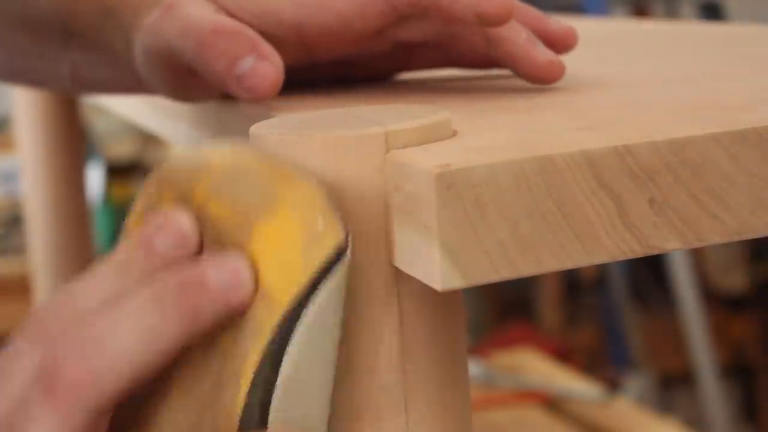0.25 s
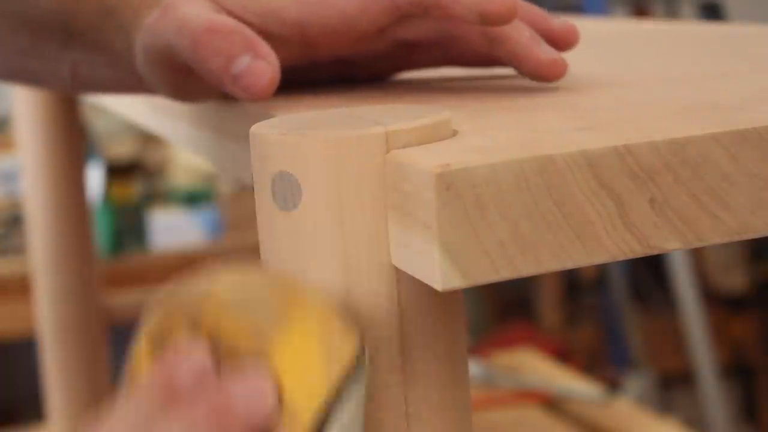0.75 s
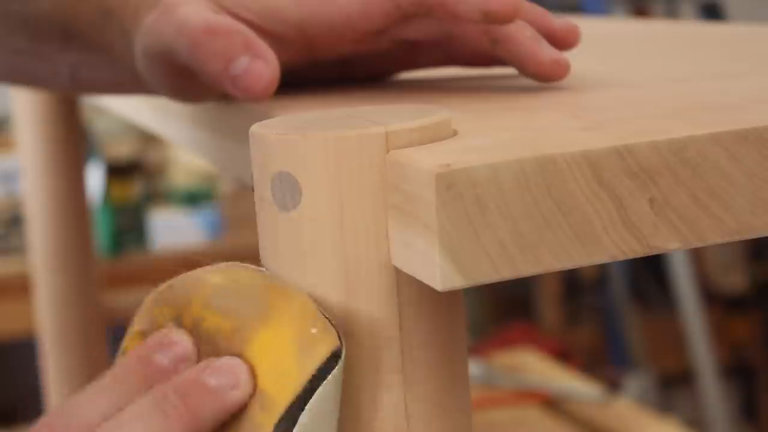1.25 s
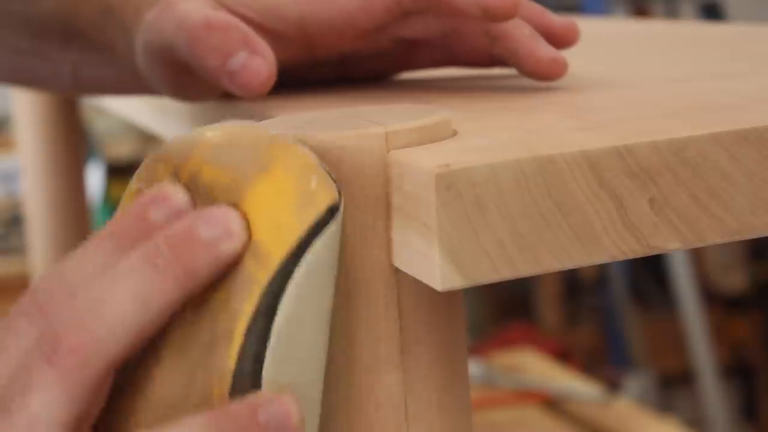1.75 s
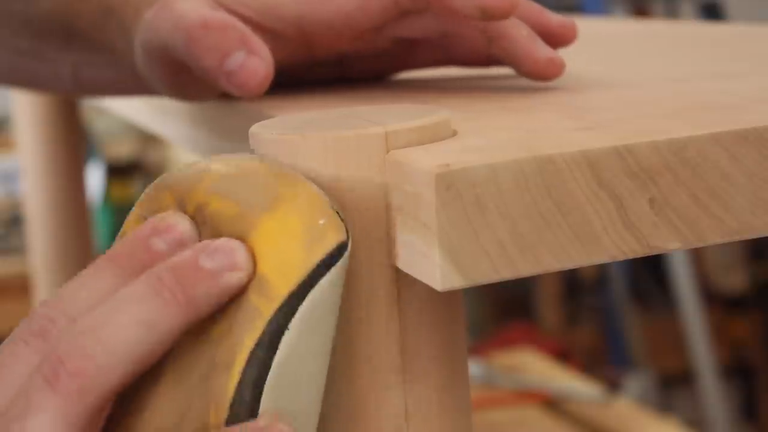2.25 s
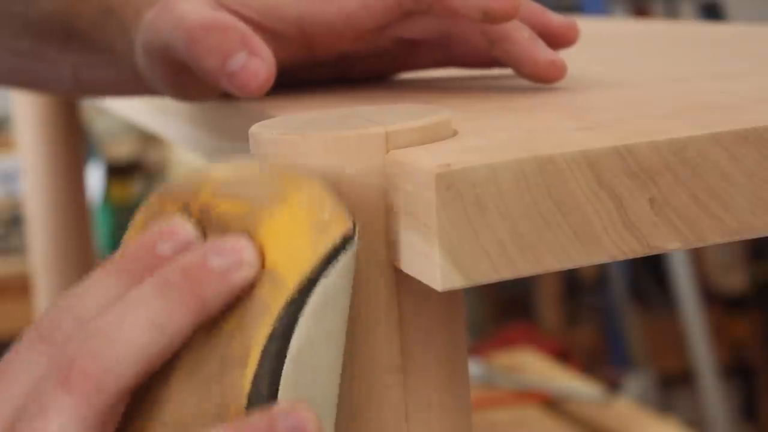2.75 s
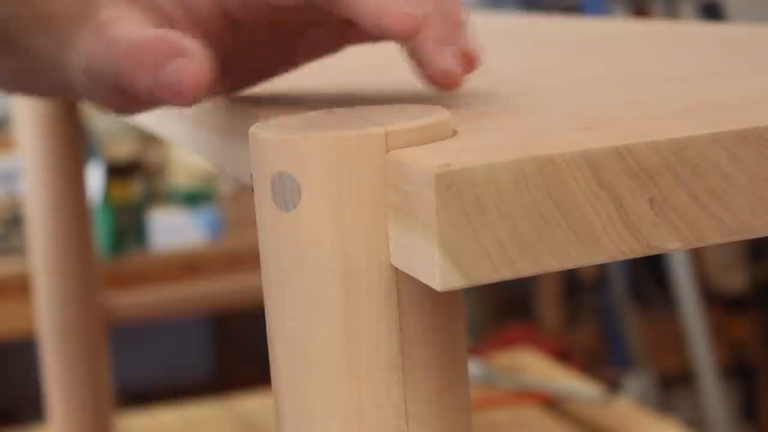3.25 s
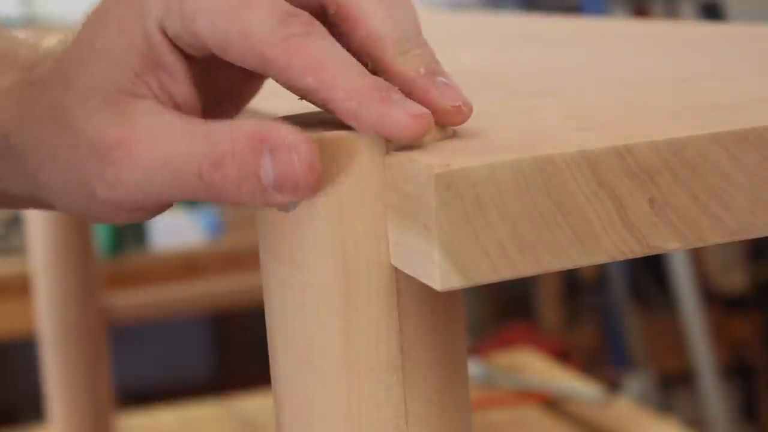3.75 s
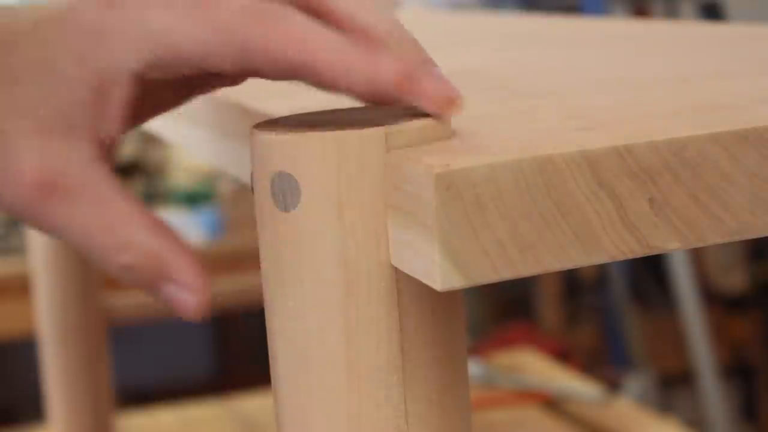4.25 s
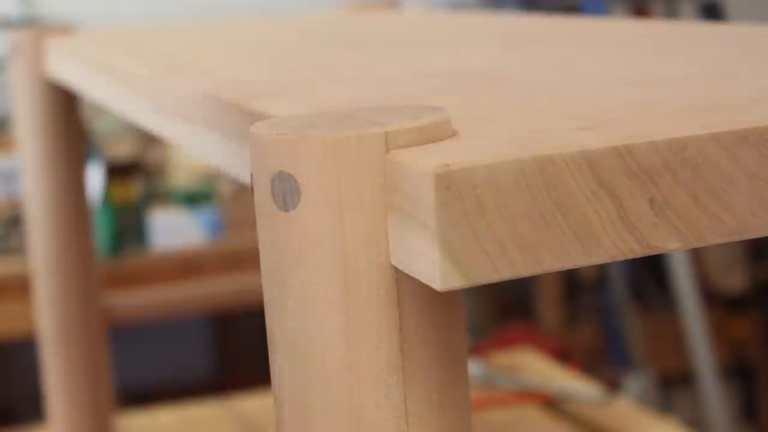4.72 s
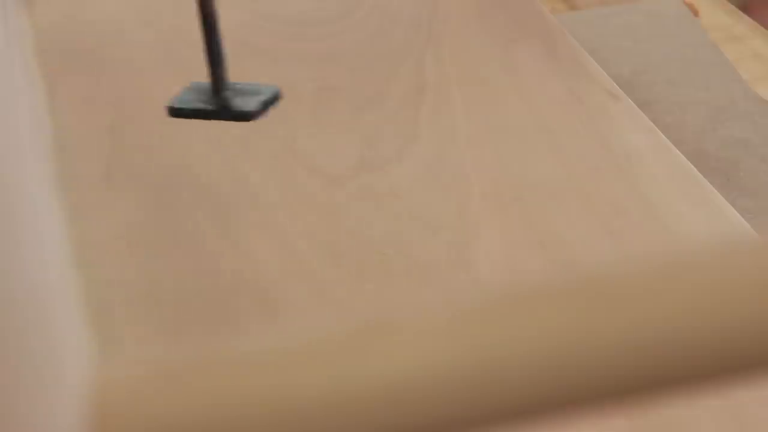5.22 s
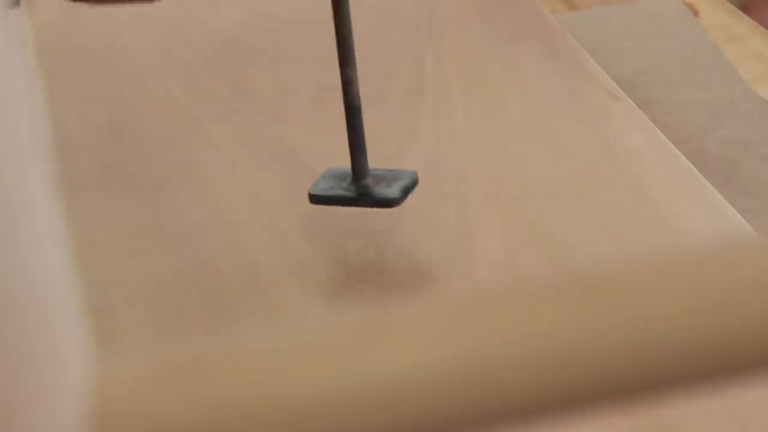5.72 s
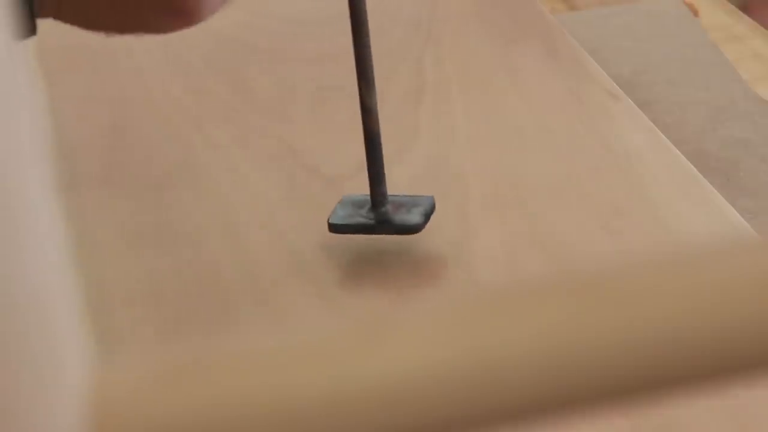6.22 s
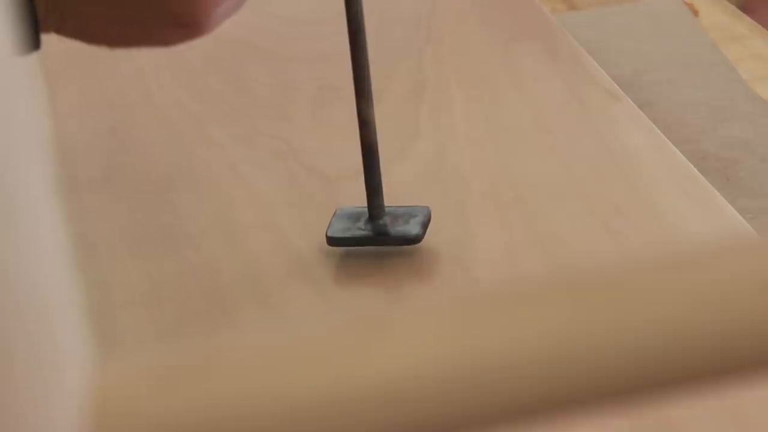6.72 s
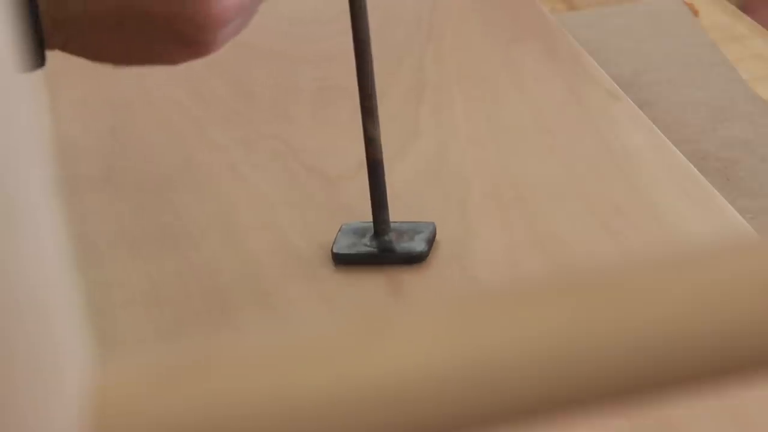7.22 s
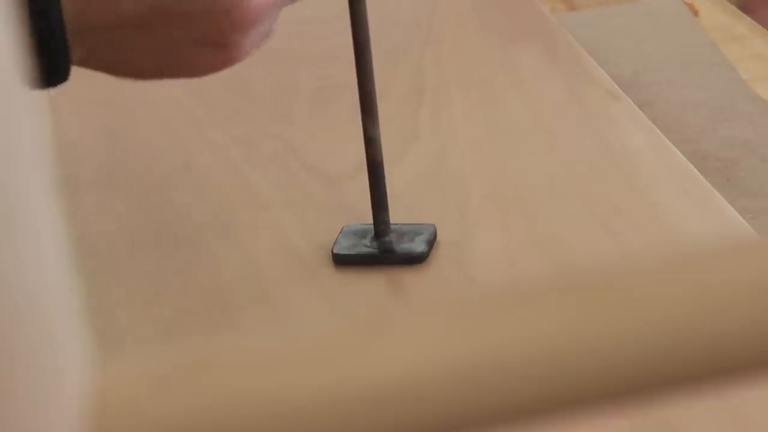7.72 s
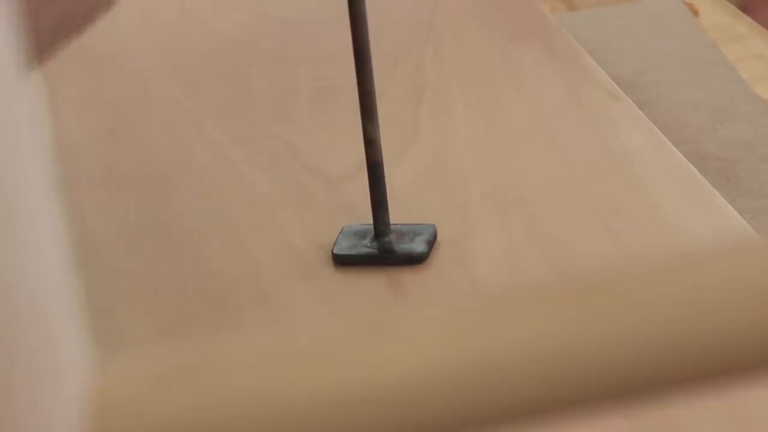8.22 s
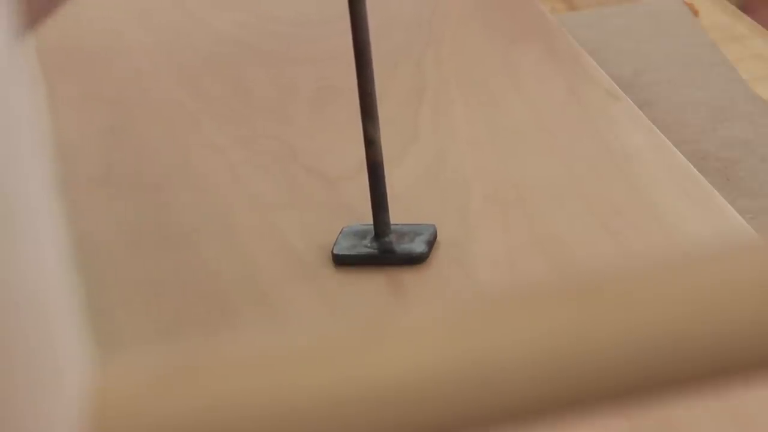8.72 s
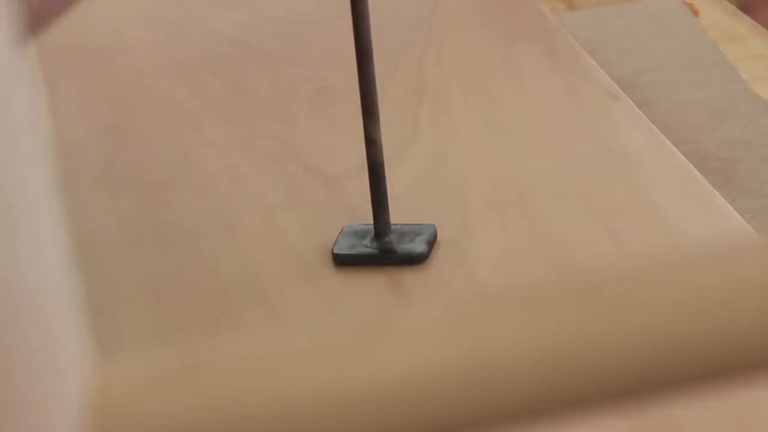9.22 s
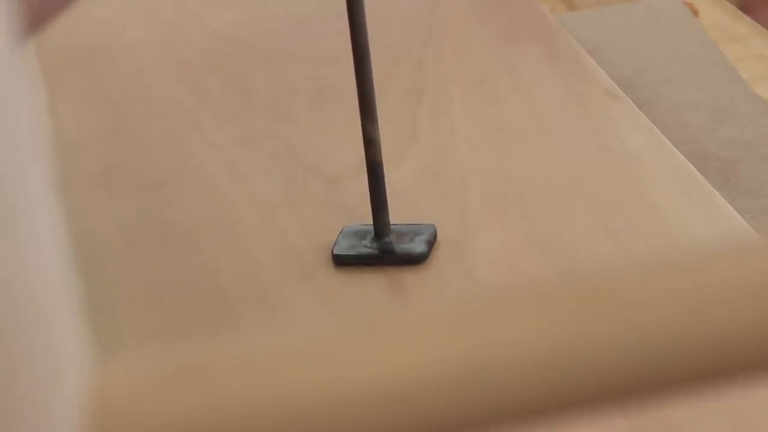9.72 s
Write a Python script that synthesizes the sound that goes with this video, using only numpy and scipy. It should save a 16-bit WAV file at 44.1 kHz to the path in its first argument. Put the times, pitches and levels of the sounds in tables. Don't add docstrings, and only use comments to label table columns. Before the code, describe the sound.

An electric sander whines and hisses steadily against a wooden leg, then abruptly a quiet workshop where an iron tool knocks onto wood and creaks.

```python
import sys
import numpy as np
from scipy import signal
from scipy.fft import rfft, irfft, next_fast_len
from scipy.io import wavfile

SR = 44100
rng = np.random.default_rng(int(sys.argv[2]) if len(sys.argv) > 2 else 0)


def level_to_linear(level):
    exponent = np.asarray(level, float) / 20
    return 10 ** exponent


def transcribe(u):
    v = np.clip(np.atleast_2d(u).T, -1, 1)
    q = np.round(v * 32767).astype(np.int16)
    wavfile.write(sys.argv[1], SR, q)


N = 439677
TIME = np.arange(N) / SR
CUT_S = 4.9345

# pitch in Hz, level in dB, time to fade by 60 dB in seconds,
# direction of motion under the iron (1 or -1).
BOARD_MODES = [(113, -36.8, 0.3, 1), (181, -44.5, 0.2, 1), (327, -20.5, 0.19, -1), (404, -17.2, 0.247, -1),
               (475, -14.7, 0.223, 1), (515, -10.8, 0.193, 1), (547, -3.5, 0.104, 1), (578, 0.0, 0.055, -1),
               (635, -6.9, 0.14, -1), (664, -7.2, 0.1, 1), (949, -4.3, 0.057, 1), (1029, -3.1, 0.128, -1),
               (1227, -13.5, 0.035, 1)]


def rms_one(x):
    return x / np.sqrt(np.mean(x ** 2) + 1e-20)


def in_time(rows):
    s, *columns = np.transpose(rows)
    return [np.interp(TIME, s, column) for column in columns]


def drift(rate):
    step = 40
    r = np.exp(-2 * step * np.pi * rate / SR)
    noise = rng.standard_normal(N // step + 2002)
    slow = signal.lfilter([1], [1, -2 * r, r * r], noise)[2000:]
    return np.interp(np.arange(N) / step, np.arange(len(slow)), rms_one(slow))


def coloured(x, spectrum, resonances):
    size = next_fast_len(N)
    hz = np.arange(size // 2 + 1) * SR / size + 1
    curve_hz, curve_db = np.transpose(spectrum)
    level_db = np.interp(np.log(hz), np.log(curve_hz), curve_db)
    for centre_hz, width_hz, bump_db in resonances:
        level_db += bump_db / (1 + (2 * (hz - centre_hz) / width_hz) ** 2)
    return rms_one(irfft(rfft(x, size) * level_to_linear(level_db), size)[:N])


def patchy(x, band_db, count=20):
    size = next_fast_len(len(x))
    spectrum = rfft(x, size)
    pitch = np.log2(np.arange(size // 2 + 1) * SR / size + 1)
    centres = np.linspace(np.log2(60), np.log2(18000), count)
    out = 0
    for centre, row in zip(centres, np.eye(count)):
        share = np.interp(pitch, centres, row)
        band = irfft(spectrum * share, size)[:len(x)]
        out = out + band * level_to_linear(band_db(2 ** centre)[:len(x)])
    return out


def ring(clicks, hz, t60):
    r, w = level_to_linear(-60 / (t60 * SR)), 2 * np.pi * hz / SR
    return signal.lfilter([0, np.sin(w)], [1, -2 * r * np.cos(w), r * r], clicks + 1e-18)


def soften(x, hz):
    return signal.sosfilt(signal.butter(2, hz, fs=SR, output="sos"), x)


def motor():
    # time in seconds, shaft turns per second, armature slot whine in dB.
    shaft = [(0.0, 177.17, -59), (0.4, 177.18, -60), (0.7, 177.13, -59), (1.0, 177.27, -64),
             (1.4, 177.16, -60), (1.7, 177.16, -58.5), (2.2, 177.26, -62.5), (2.4, 177.26, -59),
             (2.7, 177.26, -59.5), (3.1, 177.15, -58), (3.6, 177.01, -62), (3.8, 177.04, -60),
             (4.05, 176.97, -56), (4.4, 176.91, -62), (4.8, 176.87, -62)]
    fan_orders = (4, 5, 10, 14, 28, 42, 56, 70, 84)
    fan_levels = (-7.5, -17., -14., -.5, -13., -20., -30., -19.5, -30.)
    # time in seconds, level in dB.
    unbalance = [(0, 1), (.15, 3), (1.9, 4), (2.2, 2.5), (2.85, 2.5), (3.0, 0), (4.5, -1), (4.9, -3)]
    # time in seconds, level of the lower, middle and upper line in dB.
    brushes = [(0, -3, -4, -1), (.5, 0, -2, 1), (1.0, 1, 2, 2), (1.5, 0, -4, 2), (2.2, 1, 2, 0),
               (2.7, 1, -4, -5), (3.1, -5, -5, -1), (3.5, -5, 0, -4), (3.9, 1, 3, -2), (4.3, -1, 0, -2),
               (4.5, -2, 0, 1), (4.9, 0, 2, 1)]
    slot_order, commutator_order, fan_blades = 22, 44, 14
    field_hz, usual_turns_per_s = 120, 177.16
    fan_whine_db, commutator_whine_db = -56.5, -71
    speed, slot_db = in_time(shaft)
    load_db = 9 * (usual_turns_per_s - speed)
    unbalance_db, = in_time(unbalance)
    turn = 2 * np.pi * np.cumsum(speed) / SR
    out = level_to_linear(slot_db + .8 + .6 * drift(5)) * np.sin(slot_order * turn)

    for k, own_db in zip(fan_orders, fan_levels):
        level_db = fan_whine_db + own_db + 1 + 1.5 * drift(6)
        if k % fan_blades == 0:
            level_db = level_db + load_db
        if k == fan_orders[0]:
            level_db = level_db + unbalance_db
        out = out + level_to_linear(level_db) * np.sin(k * turn + k + .35 * drift(8))

    commutator_db = commutator_whine_db + .5 * drift(.5)
    for side, brush_db in zip((-1, 0, 1), in_time(brushes)):
        beat = 2 * np.pi * side * field_hz * TIME
        level_db = commutator_db + brush_db + 1 + drift(1.5)
        out = out + level_to_linear(level_db) * np.sin(commutator_order * turn + beat)
    return np.sqrt(2) * out, turn


def echoed(x):
    t60, share = .35, .17
    t = np.arange(round(t60 * SR)) / SR
    echoes = rng.standard_normal(len(t)) * level_to_linear(-60 * t / t60) * (t > .004)
    echoes = echoes / np.linalg.norm(echoes)
    echoes = signal.sosfilt(signal.butter(2, 1000, "high", fs=SR, output="sos"), echoes)
    return x + share * signal.fftconvolve(x, echoes)[:N]


def pad(turn):
    # time in seconds, grit level in dB.
    pressure = [(0.0, -46), (0.1, -46), (0.3, -46.5), (1.6, -46), (2.0, -46.5), (2.35, -46.5), (3.1, -46),
                (3.5, -46.5), (4.0, -46), (4.4, -46.5), (4.75, -44.5), (4.9, -46.5)]
    # time in seconds, loss in dB.
    grip_losses = [(.23, 2.5), (.42, 1), (.59, 1), (.83, 1), (1.04, 1.5), (1.24, 0.5), (1.41, 0.4),
                   (1.71, 2.5), (1.86, 2.2), (2.08, 0.5), (2.26, -1), (2.44, 2.5), (2.61, 3), (2.78, 2),
                   (2.94, 3), (3.14, 1), (3.30, 1.7), (3.50, 2), (3.73, 1), (3.9, 0.2), (4.24, 1.4),
                   (4.44, 1), (4.67, 1)]
    # time in seconds, half width in seconds, change in dB.
    strokes = [(.1, .12, 2), (2.95, .04, -1), (.7, .05, 1.5), (1.1, .05, -1), (1.46, 0.035, 1.5),
               (2.0, 0.059, 2), (2.16, 0.03, 4), (2.33, 0.034, 3), (3.06, .04, 2), (3.18, .05, 3.5),
               (3.65, .06, -2), (4.12, 0.15, -3), (4.42, .06, 0), (4.78, 0.076, -2)]
    # frequency in Hz, level in dB per Hz.
    sanding_colour = [(45, -33.5), (91, -23), (163, -11.5), (300, -3.5), (770, -3.5), (1200, -2),
                      (1900, 0.5), (2800, -5.5), (4000, -5.5), (5300, -10.5), (7700, -11.5), (10600, -20.5),
                      (13500, -22.5), (16000, -25)]
    # frequency in Hz, width in Hz, height in dB.
    table_bumps = [(63, 6, 3.6), (76, 6, -2.8), (76, 6, -1.0), (95, 9, 5.2), (119, 8, 6.8), (142, 9, -7.5),
                   (149, 6, -5.9), (160, 23, 4.8), (169, 19, 3.2), (252, 15, 3.8), (289, 13, 4.3),
                   (315, 10, 4.1), (338, 13, -5.6), (376, 11, -5.7), (445, 16, -4.2), (561, 19, 5.7),
                   (580, 23, -3.5), (679, 38, 4.6), (739, 12, 6.0), (765, 30, -4.8), (834, 17, 4.7),
                   (889, 16, 7.8), (902, 36, -5.1), (953, 23, 6.6), (976, 20, -5.1), (2933, 140, 3.2),
                   (3084, 30, 6.1), (4867, 80, 4.3), (6476, 260, 3.3), (12609, 506, 3.4)]
    # frequency in Hz, width in Hz, height in dB.
    housing_bumps = [(1065, 50, 3), (1460, 50, 2.5), (1785, 110, 1.5), (1175, 25, -3), (1290, 120, 1.2),
                     (2345, 30, 3), (2560, 60, 1.5), (2680, 50, -2.5), (2984, 22, 4), (3155, 20, 4),
                     (3200, 50, -3), (3596, 25, 2), (6310, 90, 2.5), (7700, 400, 1.5), (8010, 150, -3),
                     (9100, 500, 2), (14500, 1000, 2)]
    easing_s = (3.1, 3.5)
    # frequency in Hz, change in dB.
    eased_colour = [(700, 0), (1150, 2), (1650, -2.5), (2200, 0), (3100, -0.6), (4200, -0.56)]
    # share of the pressure swing, own wander in dB
    follows, wander_db = (0.95, 0.5, 0.89), (0.34, .5, 0.5)
    buzz_hz, buzz_octaves, grip_loss_s = 1710, 0.3, 0.029
    coarse = TIME[::40]
    lost_db = sum(db * np.exp(-((coarse - s) / grip_loss_s) ** 2) for s, db in grip_losses)
    grit_db = in_time(pressure)[0] - np.interp(TIME, coarse, lost_db)
    swing = grit_db - grit_db[TIME < CUT_S].mean()
    part_changes = [(share - 1) * swing + own_db * drift(5.8) for share, own_db in zip(follows, wander_db)]
    stroke_db = sum(db * np.exp(-((coarse - s) / width) ** 2) for s, width, db in strokes)
    stroke_db = np.interp(TIME, coarse, stroke_db)
    eased = np.interp(TIME, easing_s, [0, 1])
    eased_hz, eased_db = np.transpose(eased_colour)

    uneven_db = 1.3 * np.minimum(rng.exponential(1, N), 4)
    grains = rng.standard_normal(N) * level_to_linear(uneven_db)
    grains = grains * (1 + .03 * np.sin(turn)) * level_to_linear(0.24 * drift(31.0))

    def band_db(hz):
        place = np.log([450, 800, 1100, 1600, 3000, 4200])
        part_shares = ([1, 0, 0, 0, 0, 0], [0, 1, 1, 0, 0, 0], [0, 0, 0, 0, 0, 1])
        change = eased * np.interp(np.log(hz), np.log(eased_hz), eased_db)
        change = change + stroke_db * np.exp(-(np.log2(hz / buzz_hz) / buzz_octaves) ** 2)
        for shares, part_db in zip(part_shares, part_changes):
            change = change + np.interp(np.log(hz), place, shares) * part_db
        return change + 0.6 * drift(26.0)

    heard = round((CUT_S + .1) * SR)
    sanding = coloured(echoed(grains), sanding_colour, table_bumps + housing_bumps)
    sanding = patchy(sanding[:heard], band_db)
    return level_to_linear(grit_db + 4.0) * np.pad(sanding, (0, N - heard))


def knock():
    # time in seconds, ringing level in dB.
    settling = [
        (7.409, 0),
        (7.414, -9),
    ]
    stilled_first_hz, sooner_s = (404, 635, 664), .017
    blow = level_to_linear(-26.4) * (np.arange(N) == round(7.3483 * SR))
    out = -level_to_linear(-36) * ring(blow, 404, .5)
    out = out + level_to_linear(-43.0) * ring(blow, 170, .2)
    for hz, level_db, t60, sign in BOARD_MODES:
        early_s = sooner_s * (hz in stilled_first_hz)
        stilled_db = np.interp(TIME + early_s, *np.transpose(settling))
        out = out + sign * level_to_linear(level_db + stilled_db) * ring(blow, hz, t60)
    return soften(out, 400)


def creak():
    # start in seconds, hold in seconds, level in dB, fading in dB per second while held.
    presses = [
        (7.56, .04, -65, 120),
        (7.622, 0.24, -57, -1),
        (7.927, 0.033, -58, 60),
        (7.97, .04, -58, 90),
        (8.127, 0.094, -64, -30),
        (8.293, .22, -67, 60),
    ]
    attack_s, release_s = .008, .03
    out = np.zeros(N)
    for s, hold, level_db, fading_db in presses:
        shape = np.interp(TIME, [s - attack_s, s, s + hold, s + hold + release_s], [0, 1, 1, 0])
        faded_db = level_db - fading_db * np.clip(TIME - s, 0, hold)
        out = np.maximum(out, shape ** 2 * level_to_linear(faded_db))
    return out


def rocking():
    # time in seconds, level of low modes in dB, level of high modes in dB.
    touches = [(7.403, -59, -66), (7.445, -58, -72), (7.466, -53, -68), (7.564, -56, -70),
               (7.622, -50, -64), (7.65, -55, -68), (7.666, -60, -72), (7.684, -55, -59), (7.696, -65, -65),
               (7.706, -63, -63), (7.719, -63, -61), (7.735, -63, -59), (7.754, -54, -57),
               (7.766, -61, -64), (7.774, -64, -54), (7.791, -52, -70), (7.8, -60, -70), (7.814, -67, -57),
               (7.822, -57, -68), (7.835, -54, -66), (7.852, -52, -59), (7.862, -62, -65),
               (7.917, -57, -70), (7.925, -55, -53), (7.948, -60, -70), (7.963, -68, -67),
               (7.975, -47.5, -52), (7.985, -60, -63), (7.998, -62, -64), (8.012, -65, -60),
               (8.131, -47.5, -55), (8.143, -65, -62), (8.15, -58, -68), (8.171, -49, -55),
               (8.188, -60, -68), (8.2023, -54, -52.5), (8.212, -56, -65), (8.222, -59, -70),
               (8.233, -64, -64), (8.315, -61, -57), (8.326, -55, -65), (8.402, -68, -68)]
    # time in seconds, pitch in Hz, level in dB, time to fade by 60 dB in seconds.
    rebounds = [
        (7.395, 500, -53, .1),
        (7.397, 1030, -57, .13),
        (7.446, 415, -63.5, .45),
        (7.39, 185, -65, .4),
        (7.368, 690, -53, .09),
    ]
    s, low_db, high_db = np.transpose(touches)
    at = np.round(s * SR).astype(int)
    slips = (rng.random(N) < 1500.0 / SR) * rng.standard_normal(N)
    slips = slips * creak() * level_to_linear(-17.0)
    out = 0
    for hz, level_db, t60, sign in BOARD_MODES:
        touch_db = high_db - 0.5 if hz > 800 else low_db - 3.0
        clicks = slips.copy()
        clicks[at] += level_to_linear(touch_db + 1.9 * rng.normal(0, 1, len(at)))
        if hz == 404:
            out = out + sign * level_to_linear(-17) * ring(clicks, hz, .25)
        out = out + sign * level_to_linear(1.28 * level_db) * ring(clicks, hz, 0.66 * t60)
    # Hz, fading time in seconds, dB
    for hz, t60, level_db in [(1490, .021, 0), (1250, .05, -7), (2100, .008, -2), (724, .034, -3.5),
                              (180, .1, -12.5)]:
        if hz == 1490:
            level_db = -2.5
        out = out + level_to_linear(level_db) * ring(clicks, hz, t60)
    for s, hz, level_db, t60 in rebounds:
        bounce = 1. * (np.arange(N) == round(s * SR))
        out = out + level_to_linear(level_db) * ring(bounce, hz, t60)
    return soften(out, 1350.0)


def ticks():
    # time in seconds, peak in dB, centre in Hz, width in Hz.
    tick_rows = [(5.266, -59.5, 5800, 3000), (5.716, -58.5, 5800, 2400), (5.777, -53.5, 5600, 2600),
                 (5.777, -59, 8200, 2400), (6.766, -58.5, 7000, 5000), (6.995, -63, 8600, 1800),
                 (7.621, -57, 2500, 1400), (7.621, -51.5, 6400, 6000), (8.397, -62, 6500, 4000),
                 (8.712, -54.5, 6000, 2600), (8.726, -62, 6600, 2000), (8.738, -61, 6200, 2500),
                 (8.976, -62, 6000, 3000), (9.352, -54.5, 5700, 3200), (9.508, -59, 8000, 5000)]
    out = np.zeros(N)
    t = np.arange(400) / SR
    for s, peak_db, hz, width_hz in tick_rows:
        edges = np.clip([hz - width_hz / 2, hz + width_hz / 2], 500, 15000)
        burst = rng.standard_normal(len(t)) * np.exp(-t / 0.0018)
        burst = signal.sosfilt(signal.butter(3, edges, "band", fs=SR, output="sos"), burst)
        out[round(s * SR):][:len(t)] += level_to_linear(peak_db + .8) * burst / np.abs(burst).max()
    return out


def squeaks():
    # start in seconds, length in seconds, first pitch in Hz, last pitch in Hz, level in dB.
    squeak_rows = [
        (6.715, .065, 9000, 8900, -77.5),
        (6.75, .05, 7830, 7800, -77.5),
        (6.98, .025, 8350, 8350, -86),
        (5.15, .38, 370, 392, -76),
        (8.41, .14, 4090, 4080, -83),
    ]
    out = np.zeros(N)
    wobble = drift(60.0)
    for s, length, first_hz, last_hz, level_db in squeak_rows:
        span = slice(round(s * SR), round((s + length) * SR))
        gone = np.clip((TIME[span] - s) / length, 0, 1)
        phase = 2 * np.pi * np.cumsum(first_hz + (last_hz - first_hz) * gone) / SR
        phase = phase + first_hz / 7500 * wobble[span]
        swell = np.sqrt(2 * np.sin(np.pi * gone).clip(0))
        out[span] += level_to_linear(level_db) * swell * np.sin(phase)
    return out


def shop():
    # frequency in Hz, level in dB per Hz.
    air_colour = [(12, -47), (20, -24), (100, -4), (198, -11), (388, -10.5), (607, -9), (976, -5.5),
                  (1400, -12), (1810, -18.5), (3600, -22), (5000, -21), (7000, -25), (10000, -28),
                  (16000, -32)]
    # frequency in Hz, width in Hz, height in dB.
    duct_bumps = [(88, 14, 6), (125, 7.1, 10.5), (238, 18, 8.5), (480.6, 6.9, 8), (955, 220, -0.5),
                  (1227, 19, 6.5), (2890, 640, 5.5), (4090, 60, 2), (4830, 400, 2.5), (6850, 500, 3.5),
                  (9000, 480, 3.5)]
    # multiple of its turning speed, level in dB.
    far_overtones = [(38, -98), (41, -98), (42, -97), (44, -97), (50.15, -92), (54, -98), (55, -98),
                     (66.4, -99), (70.5, -94), (74, -94), (75, -94), (76, -98), (77, -96), (79, -94),
                     (80, -93), (82, -90), (84, -91), (85, -99), (86, -99), (87, -99), (90, -98), (91, -99),
                     (92, -100), (94, -99)]
    far_turns_per_s = 57.963
    air = coloured(rng.standard_normal(N), air_colour, duct_bumps)
    out = level_to_linear(-64.7) * patchy(air, lambda hz: (0.71 + 60.0 / hz) * drift(5.4), count=6)
    for k, level_db in far_overtones:
        phase = .4 * rng.uniform(0, 2 * np.pi)
        out += level_to_linear(level_db + 2) * np.sin(2 * np.pi * k * far_turns_per_s * TIME + phase)
    return out


def splits():
    # middle in seconds, low edge in Hz, high edge in Hz, level in dB.
    puffs = [(0.143, 1, 260, -73), (0.213, 5641, 6955, -61), (0.885, 8182, 9711, -63),
             (0.979, 7558, 7881, -77), (1.37, 4629, 6309, -58), (1.466, 5081, 6352, -61),
             (2.233, 6847, 8333, -58), (2.904, 6201, 7600, -60), (2.904, 8700, 10960, -62),
             (3.025, 7536, 9043, -61), (3.208, 5598, 6955, -60), (3.368, 13006, 14513, -73),
             (3.996, 13070, 14556, -72), (4.487, 5103, 6933, -59), (4.554, 5081, 6330, -60),
             (4.722, 6244, 7644, -59), (4.857, 8204, 9733, -66), (4.928, 1100, 1700, -64),
             (4.928, 1900, 2700, -66), (4.928, 3600, 4700, -68)]
    out, length = np.zeros(N), 1200
    for s, low_hz, high_hz, level_db in puffs:
        band = signal.butter(8, [low_hz + 100, high_hz - 100], "band", fs=SR, output="sos")
        puff = rms_one(signal.sosfilt(band, rng.standard_normal(length)))
        puff = puff * signal.windows.tukey(length, .6)
        out[round(s * SR) - length // 2:][:length] += level_to_linear(level_db) * puff
    return out


def scene():
    whine, turn = motor()
    before = np.exp(-np.maximum(TIME - CUT_S, 0) / .002)
    sander = whine + pad(turn)
    iron = knock() + rocking() + ticks() + squeaks()
    mono = before * sander + (1 - before) * shop() + iron
    return np.array([mono, mono])


def low_pass(x):
    return signal.sosfilt(signal.butter(12, 15730, fs=SR, output="sos"), x)


def record(dry):
    hiss = level_to_linear(-71) * rng.standard_normal((2, N)) * (TIME > CUT_S)
    low_mids = signal.butter(1, (55, 900), "band", fs=SR, output="sos")
    hiss = hiss + .5 * signal.sosfilt(low_mids, hiss)
    wet = dry + hiss + splits() * [[1], [-1]]
    top_cut = signal.ellip(14, .3, 60, 15720, fs=SR, output="sos")
    return low_pass(signal.sosfilt(top_cut, wet))


dry = scene()
out = record(dry)
transcribe(out)
```